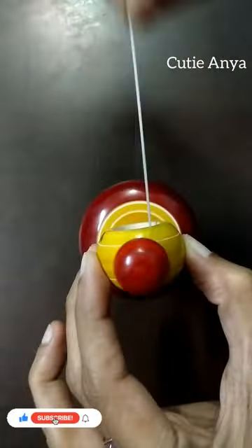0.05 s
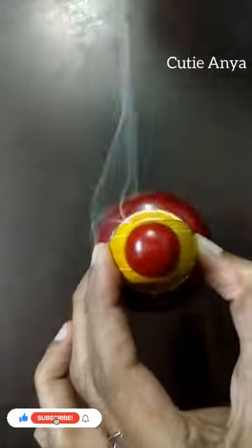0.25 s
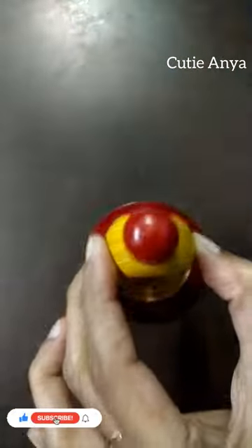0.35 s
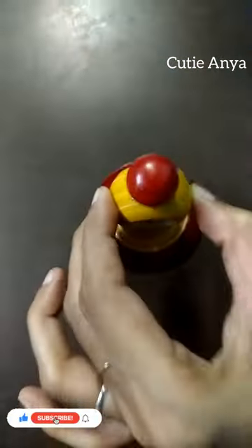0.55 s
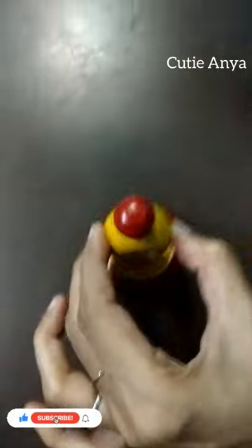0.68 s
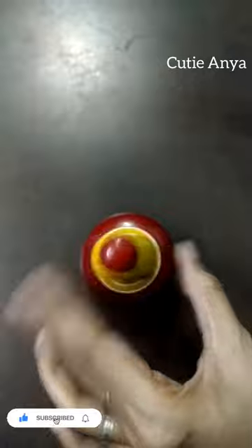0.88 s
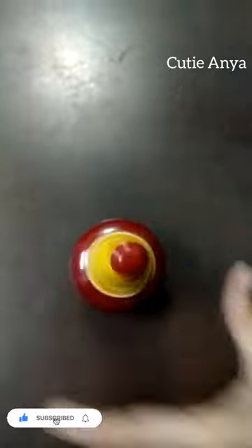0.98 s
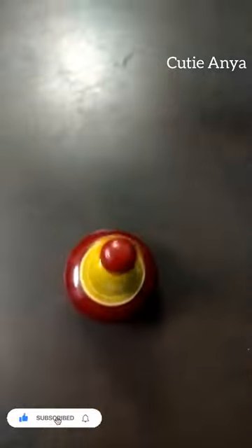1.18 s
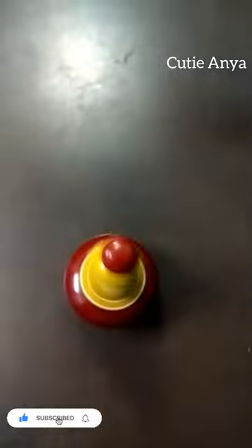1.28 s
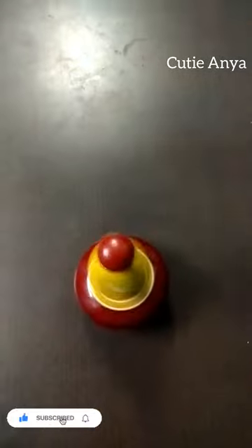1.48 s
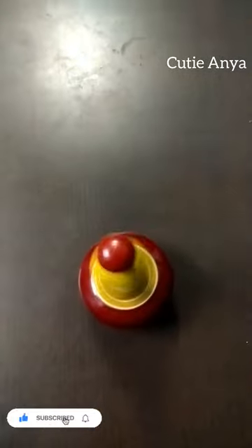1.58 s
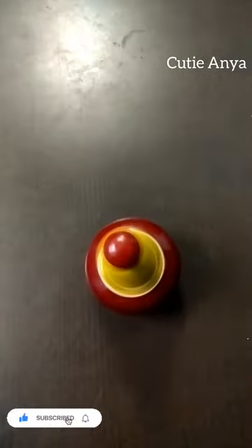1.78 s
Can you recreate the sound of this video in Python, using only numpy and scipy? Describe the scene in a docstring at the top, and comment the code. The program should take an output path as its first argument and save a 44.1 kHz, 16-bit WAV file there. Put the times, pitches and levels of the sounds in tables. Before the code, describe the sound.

A wooden toy top whirs off its string, knocks onto a table and spins quietly.

```python
"""A hiss comes first, over faint room tone: a string is pulled off a wooden toy top in its wooden holder.
Friction makes the spindle whir and squeak, and it rattles in its hole. The top drops on a table with a
hollow knock, the modes of both ringing together. The holder clatters as it is taken away, the hand bumps
about, and the top spins on quietly, its tip scouring the wood. The small room reverberates."""
import sys
import numpy as np
from scipy import signal
from scipy.fft import rfft, irfft, next_fast_len
from scipy.io import wavfile
from scipy.ndimage import map_coordinates

SR = 44100
rng = np.random.default_rng(int(sys.argv[2]) if len(sys.argv) > 2 else 0)


def put_to_file(sound):
    """Save the sound as 16-bit audio at rate SR, in the file named by the first command-line argument."""
    columns = np.atleast_2d(sound).T  # one column per channel
    safe = np.clip(columns, -1, 1)
    whole_steps = np.round(safe * 32767)
    wavfile.write(sys.argv[1], SR, whole_steps.astype(np.int16))


N = 81585

# Levels are relative within a table; balance is left over right; tilt brightens a spectrum.
# Envelopes (t/s, level/dB)
HUM_ENVELOPE = [(0, -67.5), (0.3, -70.5), (0.55, -79)]  # faint hum in the room
STRING_ENVELOPE = [(0.0, -66.5), (0.085, -57), (0.145, -51), (0.185, -44), (0.25, -41), (0.32, -44.5),
                   (0.42, -48.5), (0.6, -60), (0.76, -51.5), (0.82, -54.5), (1.0, -54.5), (1.15, -74)]  # string running out
FIZZ_ENVELOPE = [(0.1, -73), (0.2, -79), (0.32, -46.5), (0.38, -60), (0.52, -71), (0.76, -64)]  # its airy fizz at full speed
RUB_ENVELOPE = [(0.15, -65), (0.28, -60), (0.34, -50), (0.5, -45), (0.63, -47.5), (0.755, -46.5),
                (0.795, -69), (0.98, -72)]  # spindle rubbing in the holder
CRACKLE_ENVELOPE = [(0.28, -72), (0.315, -61.5), (0.42, -53.5), (0.5, -63.5), (0.63, -72), (0.71, -59),
                    (0.78, -68)]  # string's last turns and loose spindle
HOLLOW_ENVELOPE = [(0.29, -67), (0.33, -72), (0.345, -57), (0.47, -55), (0.65, -64), (0.77, -56),
                   (0.93, -74.5), (1.01, -51.5), (1.1, -64), (1.3, -87)]  # holder's hollow note
RUMBLE_ENVELOPE = [(0.68, -80), (0.72, -61.5), (0.8, -57), (0.98, -54.5), (1.18, -62), (1.3, -72),
                   (1.45, -88)]  # table under the top
SETTLE_ENVELOPE = [(0.79, -65), (0.83, -47.5), (0.95, -57), (1.02, -44), (1.1, -46.5), (1.16, -65.5),
                   (1.25, -66.5), (1.35, -101)]  # tip drumming as the top settles
DRAUGHT_ENVELOPE = [(1.03, -66), (1.06, -46.5), (1.13, -56), (1.17, -57), (1.22, -65), (1.35, -77)]  # air stirred by the hand
SCOUR_ENVELOPE = [(1.4, -106), (1.47, -67.5), (1.54, -59.5), (1.66, -65), (1.75, -69.5), (1.85, -69.5)]  # tip scouring the table

# Spectra (f/Hz, level/dB)
AMBIENT_SPECTRUM = [(12, -17), (20, 7), (60, -1.5), (127, -12), (202, -8.5), (610, -13), (1180, -18),
                    (1600, -25.5), (5680, -32), (14500, -39.5)]  # room tone
STRING_SPECTRUM = [(500, -33), (2900, -23), (4200, -24.5), (5400, -14.5), (6350, -8.5), (7300, -19.5),
                   (10200, -17), (11500, -20.5), (14300, -24)]  # sliding string
FIZZ_SPECTRUM = [(5000, -36), (8500, -16), (10300, -1), (14300, 7)]  # string at full speed
CRACKLE_SPECTRUM = [(900, -10), (1600, -1.5), (2100, -7), (2800, 6.5), (3300, -38), (6000, -38)]  # string's last turns
RATTLE_SPECTRUM = [(300, -15.5), (1000, -12.5), (2000, 13), (3000, 9), (4300, -21), (6000, -12.5),
                   (9000, -22), (14000, -21.5)]  # spindle striking its hole
CLACK_SPECTRUM = [(300, -39), (1000, -11), (2000, -7), (3300, 2.5), (5100, 2), (7000, 0), (8000, -5.5),
                  (10200, -7.5), (12000, -18.5), (14300, -20)]  # holder clattering
DRAUGHT_SPECTRUM = [(20, 7), (80, -11), (200, -11.5), (600, -49), (3000, -116.5)]  # stirred air
BUMP_SPECTRUM = [(30, -14), (90, 2), (200, -11), (450, 0), (900, -7.5), (1700, -19.5), (3000, -38),
                 (14000, -49)]  # hand bumping
TICK_SPECTRUM = [(300, -18), (1500, -11.5), (2600, 0), (3800, 0), (5000, -11), (6500, -10), (8000, -25),
                 (14000, -36)]  # holder's last tick
SCOUR_SPECTRUM = [(400, 0), (1500, 11.5), (5000, -4), (7000, 6), (14000, -4)]  # hiss of the tip

# Stereo spread of the string's hiss (f/Hz, balance/dB)
STRING_BALANCE = [(4200, 1), (5400, 8), (6350, -2), (8300, -5), (11000, 5.5)]
# Squeaky resonances of the spindle (f/Hz, bandwidth/Hz, level/dB, balance/dB)
SPINDLE_MODES = [(2060, 200, -15, -5), (6000, 450, -13, 22), (6400, 157, 2, -8.5), (7900, 910, -4, -5.5),
                 (8970, 144, 9, -8)]
# Slips of the spindle (t/s, f/Hz, level/dB)
SPINDLE_SLIPS = [(0.2757, 6200, -35), (0.3345, 9500, -43), (0.3433, 5642, -36), (0.372, 9065, -44),
                 (0.3926, 6395, -36.5), (0.408, 8800, -46), (0.598, 9100, -37), (0.639, 9130, -37),
                 (0.646, 8980, -41), (0.731, 9000, -44.5)]
# Knocks of the spindle in its hole (t/s, level/dB, tilt/(dB/octave))
SPINDLE_IMPACTS = [(0.298, -35, 7.5), (0.3297, -40, -12), (0.342, -44, 4), (0.3706, -46, -5),
                   (0.3933, -36, -7.5), (0.4208, -34.5, -10), (0.452, -40, 5), (0.4632, -37.5, -4),
                   (0.513, -30, 19), (0.5581, -39.5, -3), (0.5911, -43.5, -2), (0.6267, -45, 3),
                   (0.637, -40, 18), (0.6936, -55, 0), (0.7253, -45, 8), (0.7677, -33.5, 10)]
# Low resonances of the table (f/Hz, bandwidth/Hz, level/dB)
RUMBLE_MODES = [(140, 37, 5), (203, 18, 8), (270.2, 4.6, 13)]
# The top striking the table (t/s, level/dB)
LANDING_IMPACTS = [(0.7877, -23), (0.7919, -17.5)]
# Top and table ringing together (f/Hz, level/dB, T60/s, balance/dB)
TABLE_MODES = [(201.6, -21.5, 0.08, -1), (280, -15.5, 0.099, -1), (443.6, -2, 0.086, 2.5),
               (470.6, -17.5, 0.077, 5.5), (592.6, -12, 0.29, 11), (689, -27.5, 0.09, 6)]
# Clacks of the holder (t/s, level/dB, tilt/(dB/octave), ringing re clack/dB)
HOLDER_IMPACTS = [(0.9947, -21, 7.5, -19), (0.9974, -22, 8, -8), (1.0015, -16, 4.5, -12),
                  (1.0046, -20, 5, -27), (1.0082, -16.5, 0, 6), (1.0148, -16, 4.5, -17),
                  (1.0178, -26.5, -5, 8.5), (1.0225, -20, 3, 3.5), (1.0314, -30.5, -10, 7),
                  (1.0353, -25, -1, 0)]
# Ringing of the holder (f/Hz, level/dB, T60/s)
HOLDER_MODES = [(3330, -27, 0.05), (3525, -27, 0.045), (4466, -31, 0.05), (4980, -31, 0.05),
                (6365, -24, 0.05), (6450, -6, 0.011)]
# Soft bumps of the hand (t/s, level/dB, balance/dB, tilt/(dB/octave))
HAND_IMPACTS = [(1.0593, -35, 22, -2), (1.072, -33, 17.5, 2), (1.155, -39.5, 16.5, 7.5),
                (1.4013, -44.5, 9, -2)]
# Resonances driven by the tip (f/Hz, bandwidth/Hz, level/dB)
TIP_MODES = [(728, 94, 5), (888, 44, -2), (1340, 29, -0.5), (1790, 42, -4), (2000, 35, -1.5)]
# Thin notes of the tip (peak t/s, f/Hz, level/dB, rise/s, fall/s)
TIP_NOTES = [(1.51, 1335, -70, 0.021, 0.036), (1.64, 1824, -69.5, 0.049, 0.13),
             (1.73, 897, -69, 0.027, 0.022)]
# Reverberation time of the room (f/Hz, T60/s)
ROOM_DECAY = [(150, 0.48), (500, 0.88), (2000, 0.51), (6000, 0.51), (14000, 0.81)]

HOLLOW_HZ, HOLLOW_BALANCE_DB = 1126, 12.5  # the holder's hollow note
TIME = np.arange(N) / SR


def amp(db):
    """Amplitude ratio: tenfold for every 20 dB."""
    return 10 ** (np.asarray(db) / 20)


def unit(x):
    """Normalisation to an rms of 1."""
    return x / np.sqrt(np.mean(x ** 2) + 1e-20)


def pan(db):
    """Interchannel level difference as left and right gains."""
    return amp(np.array([[0.5], [-0.5]]) * db)


def along(points, hz):
    """Interpolation on a logarithmic frequency axis."""
    f, values = np.transpose(points)
    return np.interp(np.log(hz + 1), np.log(f + 1), values)


def envelope(rows):
    """Gain interpolated in decibels, falling 200 dB/s beyond the end points."""
    s, db = np.transpose(rows)
    return amp(np.interp(TIME, s, db) - 200 * np.abs(TIME - np.clip(TIME, s[0], s[-1])))


def wobble(rate_hz):
    """Random modulation: a spline through Gaussian values drawn at rate_hz."""
    knots = rng.standard_normal(int(N * rate_hz / SR) + 4)
    return map_coordinates(knots, [TIME * rate_hz])


def filtered(x, response):
    """Linear filtering: the spectrum is multiplied by a frequency response."""
    size = next_fast_len(N + SR // 2)
    return irfft(rfft(x, size) * response(np.fft.rfftfreq(size, 1 / SR)), size)[..., :N]


def resonance(f, hz, width):
    """Frequency response of a damped oscillator."""
    return 1j * f * width / (hz * hz - f * f + 1j * f * width)


def noise(response, alike=0):
    """Partly coherent stereo noise of rms 1; alike is the share of power common to both sides."""
    white = rng.standard_normal((3, N))
    return unit(filtered(np.sqrt(1 - alike) * white[:2] + np.sqrt(alike) * white[2], response))


def hiss(spectrum, alike=0):
    """Spectral shaping of white noise."""
    return noise(lambda f: amp(along(spectrum, f)), alike)


def driven_modes(modes, alike):
    """Random excitation of resonators in parallel."""
    return noise(lambda f: sum(amp(db) * resonance(f, hz, width) for hz, width, db in modes), alike)


def impact(spectrum, t60, tilt=0, common=0.17, size=4096):
    """An impact as a decaying noise burst through a minimum-phase filter; common feeds both sides."""
    f = np.fft.rfftfreq(size, 1 / SR)
    colour_db = along(spectrum, f) + tilt * np.log2(np.clip(f, 1000, 12000))
    cepstrum = irfft(np.log(amp(colour_db)))
    cepstrum[1:size // 2] *= 2  # folding makes the filter causal
    cepstrum[size // 2 + 1:] = 0
    burst = rng.standard_normal((2, size)) + common * rng.standard_normal(size)
    burst *= amp(-60 * np.arange(size) / SR / t60)
    x = irfft(rfft(burst) * np.exp(rfft(cepstrum)))
    return x / np.linalg.norm(x, axis=1, keepdims=True) * np.sqrt(t60 * SR / 60)


def ring(hz, t60, attack_s):
    """Free vibration of one mode: an exponentially damped sinusoid."""
    t = TIME[:SR // 3]
    return np.sin(2 * np.pi * hz * t) * amp(-60 * t / t60) * (1 - np.exp(-t / attack_s))


def add(out, s, x):
    """Superposition of x on out, starting at time s."""
    i = round(s * SR)
    out[:, i:i + x.shape[-1]] += x[..., :N - i]


def in_room(x, wet_db):
    """Reverberation: direct sound plus a diffuse tail, each frequency decaying at its own rate."""
    hz, t, bands = signal.stft(rng.standard_normal((2, SR // 2)), SR, nperseg=256)
    tail = signal.istft(bands * amp(-60 * t / along(ROOM_DECAY, hz)[:, None]), SR, nperseg=256)[1]
    tail *= np.minimum(TIME[:tail.shape[1]] / 0.0015, 1)
    return x + amp(wet_db) * signal.fftconvolve(x, tail / np.linalg.norm(tail[0]), axes=1)[:, :N]


def room_tone():
    """Ambient noise: steady broadband rumble and hiss, with a faint hum that fades early."""
    hum = np.sin(2 * np.pi * 167 * TIME + 0.28 * wobble(8.7))
    floor = amp(-60.5) * hiss(AMBIENT_SPECTRUM, alike=0.52) * pan(2.5)
    return floor + envelope(HUM_ENVELOPE) * unit(hum)


def string():
    """Sliding friction: the string's hiss and fizz are modulated as fibres catch and the pull surges."""
    catch_db, surge_db = 0.5, 1.5
    fibres = amp(catch_db * wobble(500) + surge_db * wobble(89.5))
    friction = noise(lambda f: amp(along(STRING_SPECTRUM, f)) * pan(along(STRING_BALANCE, f)))
    slide = envelope(STRING_ENVELOPE) * unit(fibres * friction)
    fizz = envelope(FIZZ_ENVELOPE) * unit(fibres * hiss(FIZZ_SPECTRUM)) * pan(11)
    return slide + fizz


def spindle_response(f):
    """Modal superposition: the spindle responds as the sum of its resonances."""
    return sum(amp(db) * pan(side) * resonance(f, hz, width) for hz, width, db, side in SPINDLE_MODES)


def spindle_whir():
    """Amplitude modulation: friction peaks once a turn, driving the slowing spindle and hollow holder."""
    spin_hz, sag_hz_per_s, whir_db, rough_db = 50.24, 35, 3, 3
    turns = np.cumsum(spin_hz - sag_hz_per_s * TIME + 3 * wobble(11.95)) / SR
    grip = amp(whir_db * np.cos(2 * np.pi * turns) + rough_db * wobble(600))
    rub = unit(filtered(grip * rng.standard_normal((2, N)), spindle_response))
    hollow = unit(filtered(grip * rng.standard_normal(N), lambda f: resonance(f, HOLLOW_HZ, 94) ** 2))
    return envelope(RUB_ENVELOPE) * rub + envelope(HOLLOW_ENVELOPE) * hollow * pan(HOLLOW_BALANCE_DB)


def spindle_squeaks():
    """Stick-slip friction: each slip emits a rough tone a few milliseconds long."""
    half_length_s, rough_rad = 0.0015, 0.63
    out = np.zeros((2, N))
    for s, hz, db in SPINDLE_SLIPS:
        phase = 2 * np.pi * hz * TIME + rough_rad * np.array([wobble(1000), wobble(1000)])
        pulse = np.exp(-0.5 * ((TIME - s) / half_length_s) ** 2)
        out += amp(db) * pan(-7.5) * pulse * np.sin(phase)
    return in_room(out, wet_db=-0.5)


def crackle():
    """Random amplitude modulation: the string's last turns and the loose spindle crackle drily."""
    grains = amp(2.8 * wobble(400)) * hiss(CRACKLE_SPECTRUM)
    return envelope(CRACKLE_ENVELOPE) * unit(grains) * pan(-2.5)


def spindle_rattle():
    """Impulse excitation: knocks in the hole ring the spindle's modes and the holder's hollow note."""
    knocks = np.zeros((2, N))
    hollow = ring(HOLLOW_HZ, t60=0.11, attack_s=0.00066) * pan(HOLLOW_BALANCE_DB)
    for s, db, tilt in SPINDLE_IMPACTS:
        add(knocks, s, amp(db + 6) * impact(RATTLE_SPECTRUM, t60=0.005, tilt=tilt, common=1.5) * pan(-1))
        add(knocks, s, amp(db - 18.5 - max(tilt, 0)) * hollow)  # weaker in bright knocks
    ringing = amp(-3) * filtered(knocks, spindle_response)
    return in_room(knocks + ringing, wet_db=-5.5)


def table_rumble():
    """Forced vibration: the spinning top drives the table's low resonances."""
    return envelope(RUMBLE_ENVELOPE) * driven_modes(RUMBLE_MODES, alike=0.97)


def landing():
    """Damped free vibration: top and table ring together on impact, then are cut short."""
    free_s, damped_t60 = 0.033, 0.0092
    knock = np.zeros((2, N))
    modes = sum(amp(db) * pan(side) * ring(hz, t60, attack_s=0.0014) for hz, db, t60, side in TABLE_MODES)
    for s, db in LANDING_IMPACTS:
        add(knock, s, amp(db) * modes)
    damped_s = np.maximum(TIME - LANDING_IMPACTS[0][0] - free_s, 0)
    return in_room(knock * amp(-60 * damped_s / damped_t60), wet_db=-22)


def settling():
    """Sustained excitation: the drumming tip keeps the modes of top and table droning."""
    def response(f):
        return sum(amp(db / 2) * pan(side) * resonance(f, hz, width=3.63 / t60) ** 2
                   for hz, db, t60, side in TABLE_MODES)
    return envelope(SETTLE_ENVELOPE) * noise(response, alike=0.96)


def holder_ring():
    """Free vibration of the holder, its modes varying in strength from blow to blow."""
    return sum(amp(db + rng.normal(0, 1)) * ring(hz, t60, attack_s=0.0002)
               for hz, db, t60 in HOLDER_MODES)


def holder_clatter():
    """Friction and impact: the holder scrapes and clatters in a run of bright, ringing clacks."""
    start_s, rise_s, hold_s, t60 = 0.9895, 0.0053, 0.023, 0.091
    t = TIME - start_s
    stroke = np.clip(t / rise_s, 0, 1) ** 2 * amp(-60 * np.maximum(t - hold_s, 0) / t60)
    grains = unit(amp(4.5 * wobble(1200)) * hiss(CLACK_SPECTRUM))
    out = amp(-30) * stroke * grains * pan(4)
    for s, db, tilt, ring_db in HOLDER_IMPACTS:
        clack = impact(CLACK_SPECTRUM, t60=0.0057, tilt=tilt)
        add(out, s, amp(db) * pan(-2) * clack)
        add(out, s, amp(db + ring_db) * pan(-2) * holder_ring())
    return in_room(out, wet_db=-9)


def hand():
    """Soft impacts and air flow are mostly low in frequency: the hand bumps and stirs air on the left."""
    bumps = np.zeros((2, N))
    for s, db, side, tilt in HAND_IMPACTS:
        add(bumps, s, amp(db) * pan(side) * impact(BUMP_SPECTRUM, t60=0.02, tilt=tilt))
    draught = envelope(DRAUGHT_ENVELOPE) * hiss(DRAUGHT_SPECTRUM, alike=0.29) * pan(20)
    return in_room(bumps, wet_db=-26) + draught


def holder_tick():
    """Added damping: the holder, being held, rings only briefly after one last dry tick."""
    start_s, held_t60 = 1.1927, 0.037
    tick = np.zeros((2, N))
    damping = amp(-60 * TIME[:SR // 3] / held_t60)
    add(tick, start_s, impact(TICK_SPECTRUM, t60=0.002, common=0.58))
    add(tick, start_s, amp(-5.5) * damping * holder_ring())
    return in_room(amp(-26) * pan(11.5) * tick, wet_db=-20)


def tip():
    """Frictional excitation: the spinning tip scours the table faintly and sings a few thin notes."""
    scour = driven_modes(TIP_MODES, alike=0.17) + amp(-4) * hiss(SCOUR_SPECTRUM)
    out = envelope(SCOUR_ENVELOPE) * scour
    for s, hz, db, rise, fall in TIP_NOTES:
        swell = np.exp(-((TIME - s) / np.where(TIME < s, rise, fall)) ** 2)
        out += amp(db) * swell * unit(np.sin(2 * np.pi * hz * TIME + 0.5 * wobble(31.85)))
    return out


def scene():
    """Linear superposition: the sound pressures of all sources add."""
    launch = room_tone() + string() + spindle_whir() + spindle_squeaks() + crackle() + spindle_rattle()
    drop = table_rumble() + landing() + settling()
    return launch + drop + holder_clatter() + hand() + holder_tick() + tip()


def record(dry):
    """Band limiting: an ideal low-pass filter removes the highest treble."""
    return filtered(dry, lambda hz: hz < 14550)


dry = scene()
out = record(dry)
put_to_file(out)
```